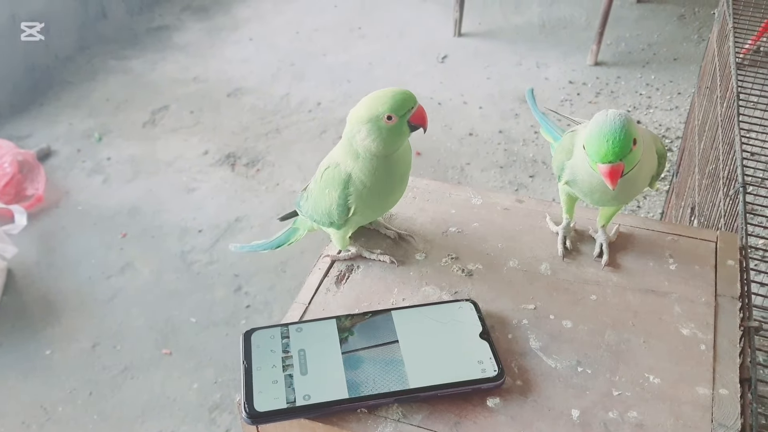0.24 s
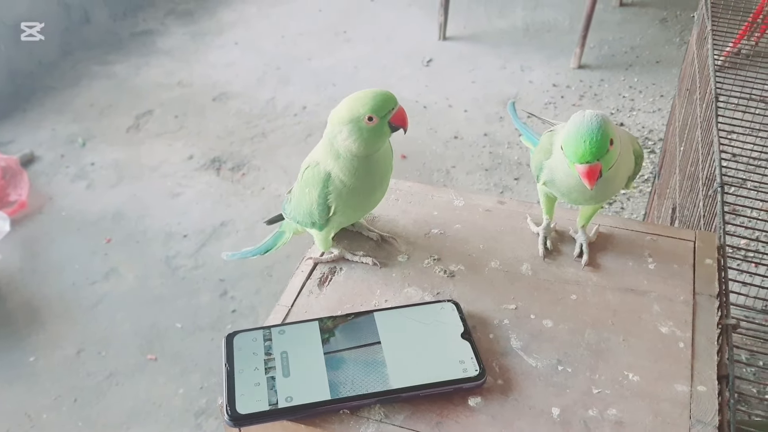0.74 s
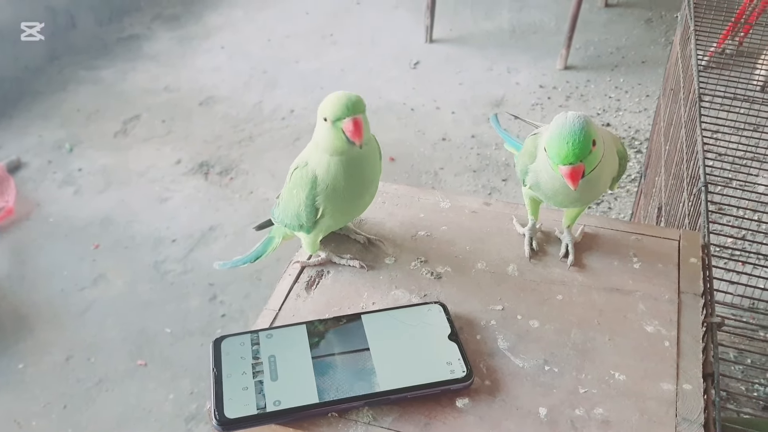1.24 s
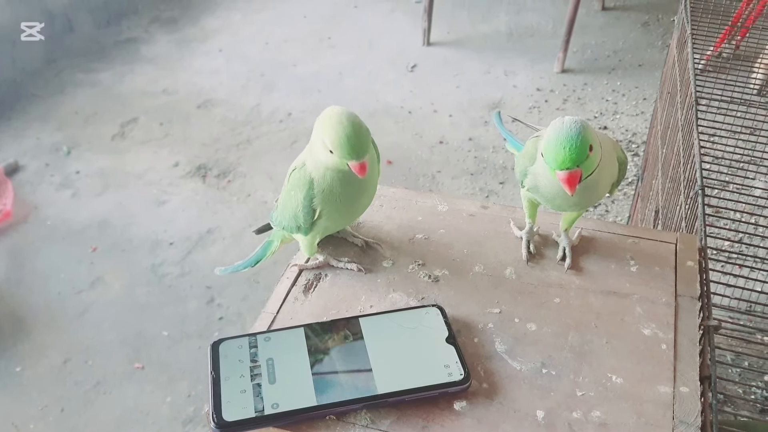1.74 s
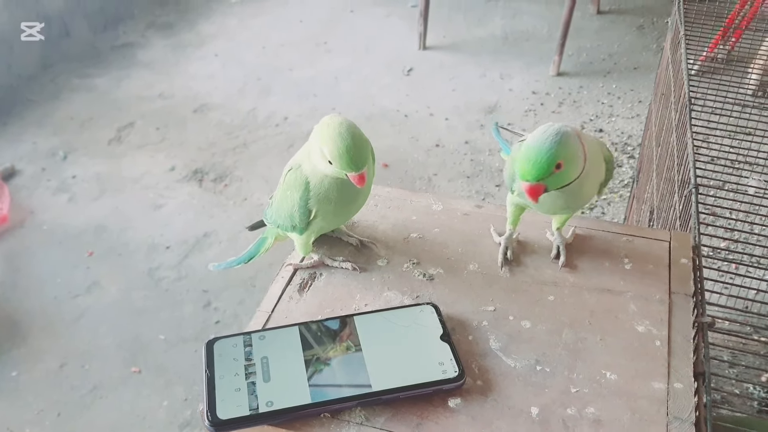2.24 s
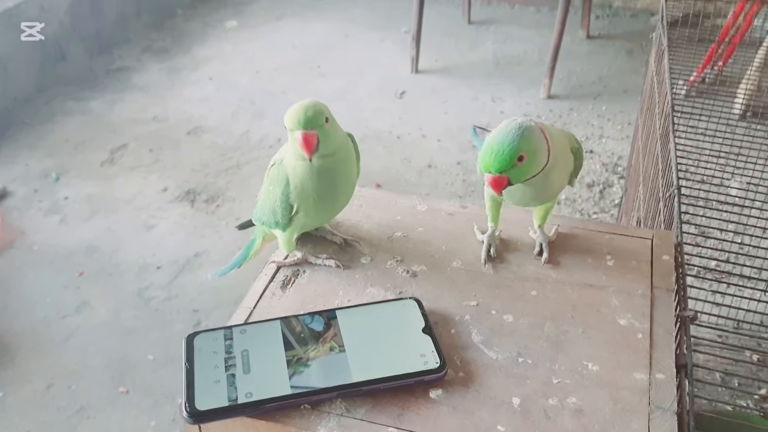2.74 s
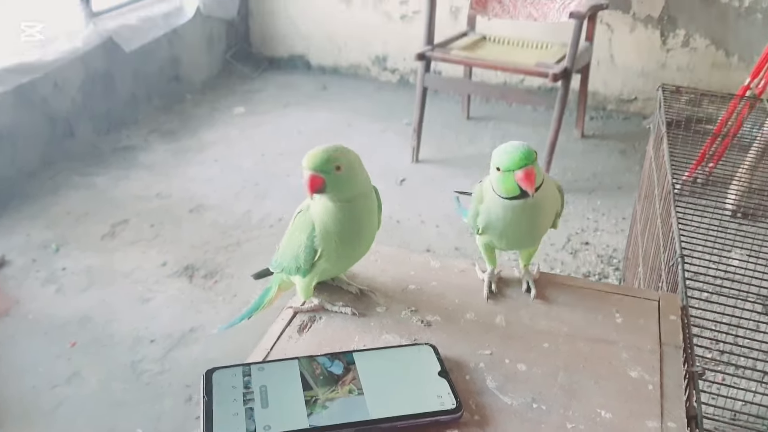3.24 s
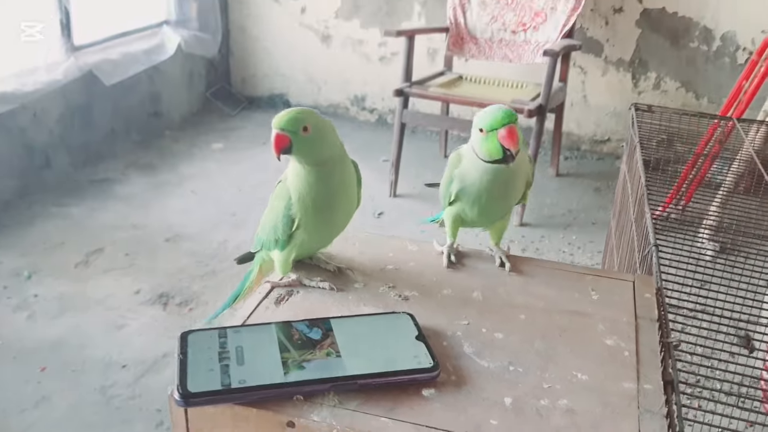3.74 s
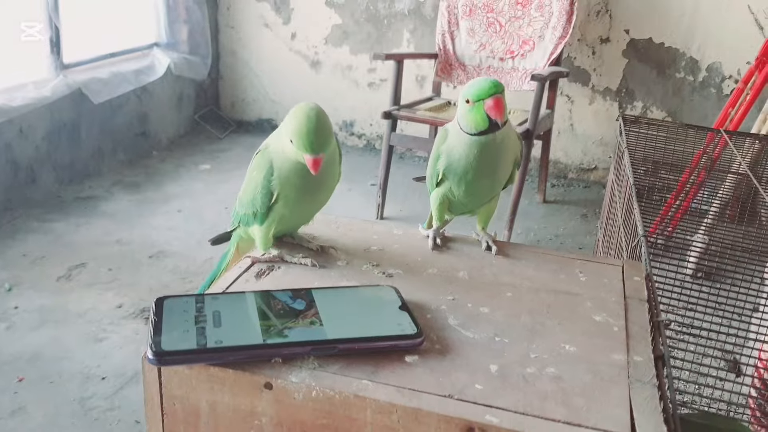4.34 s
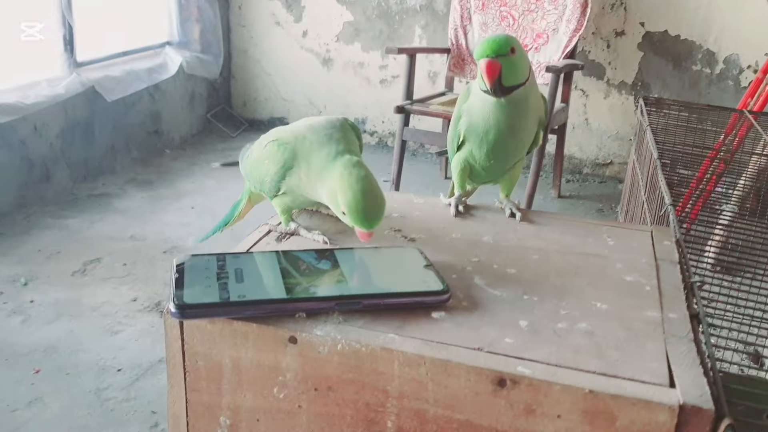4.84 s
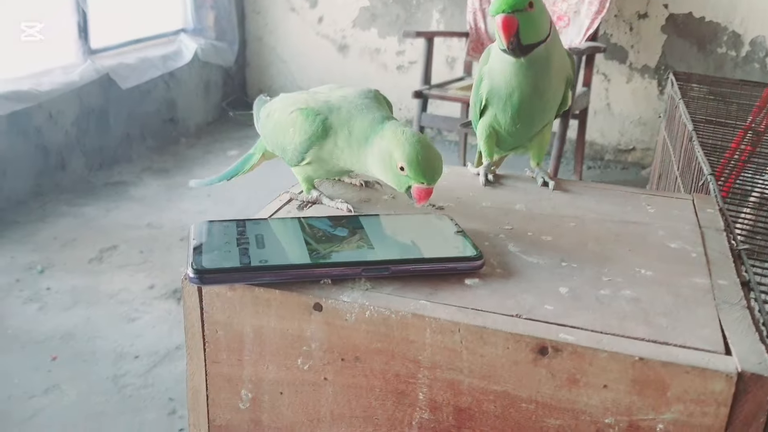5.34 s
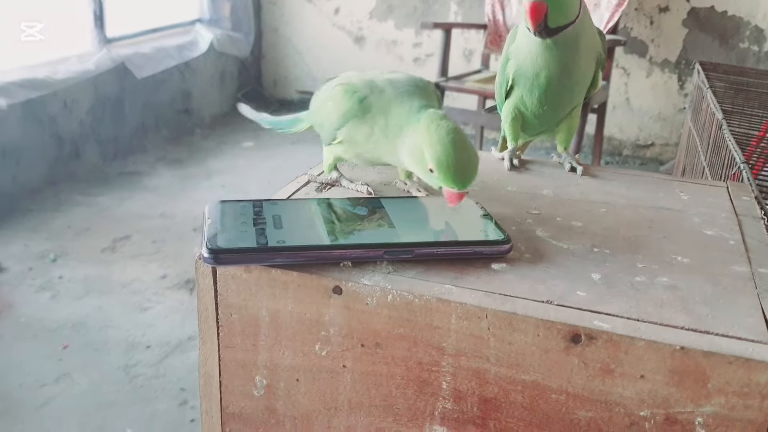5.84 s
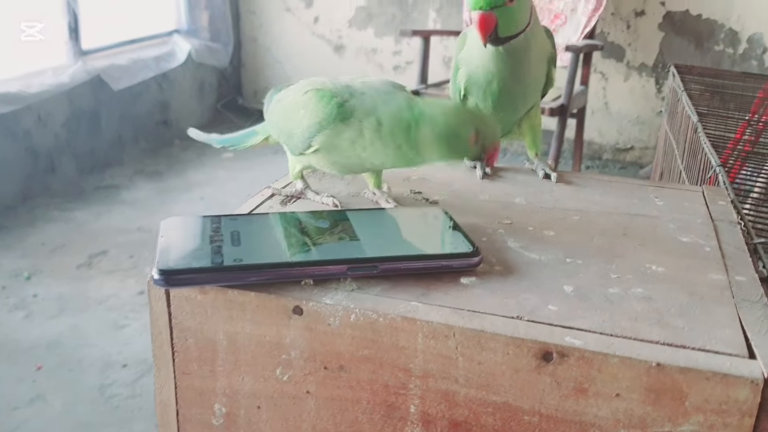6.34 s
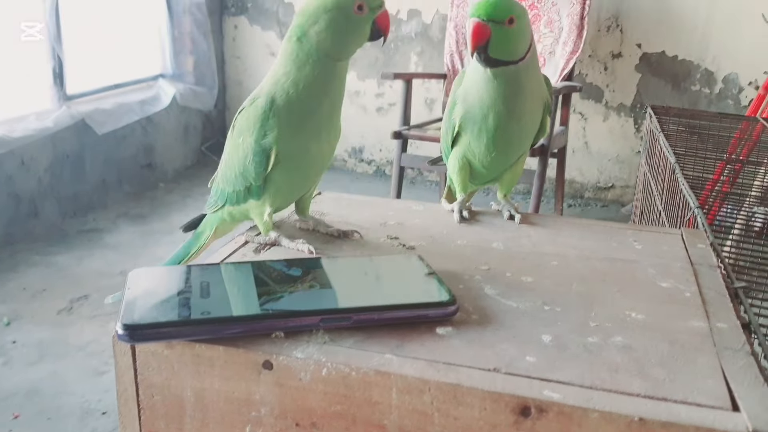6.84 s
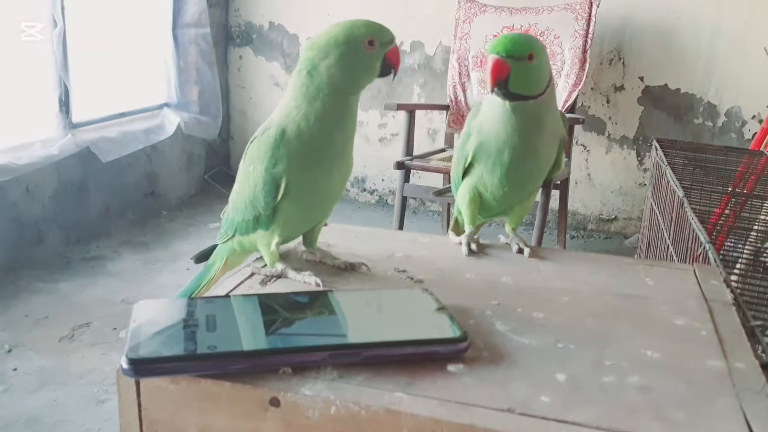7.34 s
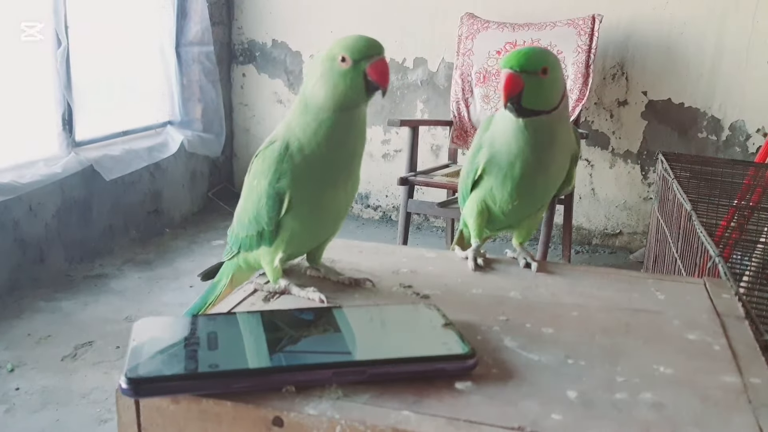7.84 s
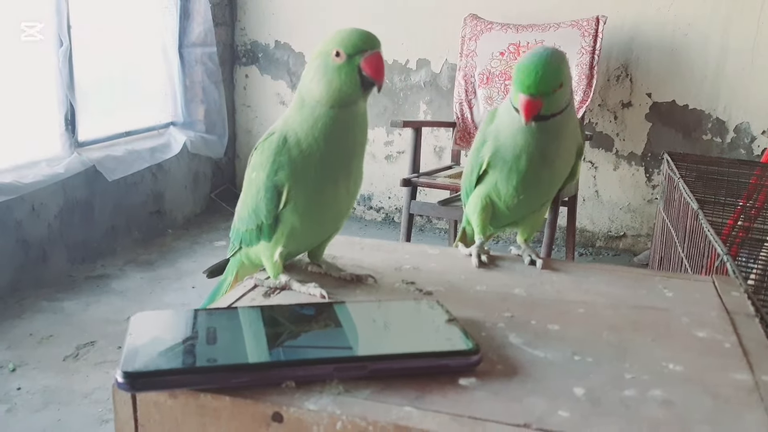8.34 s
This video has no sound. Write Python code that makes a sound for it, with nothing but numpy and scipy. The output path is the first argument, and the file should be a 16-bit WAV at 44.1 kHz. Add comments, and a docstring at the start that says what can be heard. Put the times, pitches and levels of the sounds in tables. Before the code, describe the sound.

Indoors, parakeets on a wooden table give separate nasal squawks that glide up and drop abruptly. Hoarse, distant-sounding answers fall between them. A buzzing rattle swells near the middle and a quieter one later, followed by a row of small whistled chips and sharp yelps. Short bright room echo, soft rustles, handling bumps, and a barely audible hum lie underneath.

```python
"""Parakeets call on a wooden table in a bare room: gliding squawks, breaking yelps, pulsed rattles, thin
whistles. Squawks, yelps and rattles are harmonics of a vibrating membrane shaped by a throat; whistles are
nearly pure tones. Hoarse calls are uneven noise. Fainter, wetter calls sound between the near ones, and a few
taps sound. Behind them lie a low rumble, a faint steady hum, soft rustles and still air; echoes make the room."""
import sys
import numpy as np
from scipy import signal
from scipy.fft import rfft, irfft, next_fast_len
from scipy.io import wavfile
from scipy.ndimage import uniform_filter1d, map_coordinates

SR = 44100
rng = np.random.default_rng(int(sys.argv[2]) if len(sys.argv) > 2 else 0)


def transcribe(u):
    """Save the signal u as a 16-bit wav file named by the first command-line argument.

    u: samples, shape (n,) or (channels, n), limited to [-1, 1]; the rate is SR.
    q: integer samples, one column per channel.
    """
    v = np.clip(np.atleast_2d(u).T, -1, 1)
    q = np.round(v * 32767).astype(np.int16)
    wavfile.write(sys.argv[1], SR, q)


N = 379701
TIME = np.arange(N) / SR
CUTOFF_HZ = 15800   # no partials or echoes above this

# Levels of all calls are before the mix in scene(); spectra give relative levels.
# throat resonances of the squawks and yelps: hz, level_db
THROAT = [(500, -6), (2000, 7), (2800, 4.5), (3600, -8.5), (5300, -5), (6300, -10.5), (7200, -13),
          (8500, -23.5), (11000, -23.5), (14500, -29), (16000, -39.5)]
# chips, a whistle between two hisses: start_s, length_s, top_hz, droop (share of pitch), whistle_db, hiss_db
CHIPS = [(6.523, 0.13, 3910, 0.088, -31, -30.5), (6.792, 0.11, 3900, 0.11, -32.5, -26.5),
         (7.079, 0.12, 3880, .07, -29, -25.5), (7.359, .095, 3810, .07, -29, -26.5),
         (7.503, 0.15, 3630, .12, -29, -27)]
# this far under its top level a squawk is mostly its two lowest partials:
# the fundamental there, and the change of the upper partials
SOFT_RANGE_DB, SOFT_FIRST_DB, SOFT_UPPER_DB = 26.5, 2.5, -17


def near_squawks(waver=.0038, rasp=0.011, screech_rasp=0.011, uneven=0.0067, push_lead=0.67):
    """Pitch glides to its top value and collapses; a fast flutter swings pitch and level together."""
    # start_s, length_s, rise_s, collapse_s, start_hz, top_hz, creep at the top (Hz/s), start_db, top_db,
    # last push_db, fundamental_db and upper_db (against the second partial, when loud), screech (0-1)
    squawks = [(.548, .38, .1, .035, 1205, 1175, 120, -21, -19.5, 1, -20, -3, 1.0),
               (1.445, .583, .28, .045, 765, 1220, 300, -48, -19, 1, -17, -5, .9),
               (2.355, .23, .205, .008, 1370, 2470, 0, -39, -14, 5, 22, 3, 0),
               (4.83, .302, .17, .08, 804, 1040, 0, -36, -26, 8, -8, -10, 0),
               (5.79, .53, .37, .068, 737, 1385, -400, -45, -16.5, 4, -11, 4, 0),
               (7.475, .125, .04, .012, 735, 760, 0, -38, -26, 0, -2, -14, 0),
               (7.627, .127, .045, .06, 1030, 1005, 0, -30, -22, 3, -6, -7, 0),
               (8.405, .4, .26, .05, 740, 1200, 0, -43, -24, 0, -4, -18, 0)]
    # change of the throat in a full screech: hz, change_db
    screech_colour = [(500, 14), (3000, -2.5), (4700, 5), (5800, -9.5), (7000, -9.5), (8300, -6),
                      (9600, 12.5), (11500, -9.5), (14500, -0.5)]
    attack_s, dip_s, push_s = 0.03, .04, 0.074
    # what the final collapse does: pitch lost (share), level, fundamental, added pitch scatter (share)
    collapse_share, collapse_db, collapse_first_db, collapse_rasp = .61, -18.5, 13, 0.067
    # pitch swings of the flutter (shares), and level swing for each unit of pitch swing
    screech_swing, shake_swing, throb_per_swing = 0.1, 0.054, 1.78
    shake_hz, shake_width_hz = 1220, 140   # any squawk shakes as it passes this pitch
    cycles_per_shake, cycles_per_screech = 12.5, 9.2   # vibrations in one flutter

    scatter = drift(940)
    wander = 1 + waver * drift(28)
    pace = 1 + uneven * drift(45)
    out = np.zeros(N)
    for (start, length, rise_s, fall_s, start_hz, top_hz, creep, start_db, top_db,
         push_db, first_db, upper_db, screech) in squawks:
        at, age, gate = span(start, length, attack_s, .004)
        _, pitch, level_db = arch(age, dip_s, rise_s, start_hz, top_hz, start_db, top_db)
        soft = np.clip((top_db - level_db) / SOFT_RANGE_DB, 0, 1)
        left_s = length - age
        collapse = np.clip(1 - left_s / fall_s, 0, 1) ** 2
        pitch = pitch + creep * np.maximum(age - dip_s - rise_s, 0)
        push = np.exp(-((left_s - push_lead * fall_s) / push_s) ** 2)
        level_db = level_db + collapse_db * collapse + push_db * push

        strain = np.clip(screech, 0, 1) * (1 - soft)   # a screech opens the beak and moves the resonances
        shake = shake_swing * np.exp(-((pitch - shake_hz) / shake_width_hz) ** 2)
        swing = np.maximum(screech_swing * strain, shake)
        cycles = cycles_per_shake + (cycles_per_screech - cycles_per_shake) * strain
        flutter = np.sin(2 * np.pi * np.cumsum(pitch / cycles * pace[at]) / SR)
        # a sharp swell at the top of each swing, with the average power held level
        throb = np.exp(throb_per_swing * swing * (flutter + flutter ** 2 / 2))
        throb /= np.sqrt(uniform_filter1d(throb ** 2, size=SR // 25))

        roughness = rasp + screech_rasp * strain + collapse_rasp * collapse
        bend = wander[at] + swing * flutter + roughness * scatter[at]
        first = first_db + (SOFT_FIRST_DB - first_db) * soft + collapse_first_db * collapse
        tone = syrinx(pitch * (1 - collapse_share * collapse) * bend, first, upper_db + SOFT_UPPER_DB * soft,
                      lambda hz: at_hz(THROAT, hz) + strain * at_hz(screech_colour, hz))
        out[at] += gate * throb * from_db(level_db) * tone
    return out


def arch(age, dip_s, rise_s, start_hz, top_hz, start_db, top_db):
    """Effort grows after a short dip and carries pitch and level from start to top values, up or down."""
    effort = np.sin(np.pi / 2 * np.clip((age - dip_s) / rise_s, 0, 1)) ** 1.7
    settle = 1 + .04 * np.clip(1 - age / dip_s, 0, 1) ** 2   # enters a little sharp, then settles
    pitch = settle * (start_hz + (top_hz - start_hz) * effort)
    level_db = start_db + (top_db - start_db) * effort ** 1.4
    return effort, pitch, level_db


def yelps(rasp=0.0091, waver=0.0061, edge_s=0.001):
    """The voice breaks into a new register, rough at first, then glides and fades."""
    # start_s, length_s, from_hz, to_hz, bend of the glide (power), peak_db, swell_s, fade (dB/s),
    # fundamental_db, upper_db, pitch scatter at the break (share)
    yelp_rows = [(0.0, 0.037, 1260, 504, 0.84, -9.5, 0.00094, 850, -17, -7, 0.12),
                 (2.578, 0.035, 1790, 453, 1.18, -13, 0.0093, 1200, -16, -12, 0.097),
                 (5.303, 0.082, 1377, 1875, 2.05, -18.5, 0.056, 20, 2, -14.5, 0.028),
                 (5.386, 0.068, 1470, 1292, 1.46, -9.5, .005, 125.5, -16.5, -14, .03),
                 (5.457, 0.061, 883.5, 864, 1.9, -18.5, 0.0089, 68, -6.5, 4.5, 0.19),
                 (7.86, .103, 871, 1946, 2.5, -15.5, 0.077, 599, -1.5, -15.5, 0.0043),
                 (7.967, 0.071, 1406, 1383, 3.8, -8.5, 0.0026, 104.5, -17.5, -19, 0.0028),
                 (8.03, 0.074, 937, 863, 1.7, -14.5, 0.021, 225, -7, 8, 0.22)]
    swell_db_per_s, break_s = 293.5, 0.013

    scatter = drift(920)
    wander = 1 + waver * drift(28)
    out = np.zeros(N)
    for (start, length, from_hz, to_hz, bend, peak_db, swell_s, fade,
         first_db, upper_db, break_rasp) in yelp_rows:
        at, age, gate = span(start, length, edge_s, edge_s)
        pitch = to_hz + (from_hz - to_hz) * np.clip(1 - age / length, 0, 1) ** bend
        pitch *= wander[at] + (rasp + break_rasp * np.exp(-age / break_s)) * scatter[at]
        level_db = peak_db - np.maximum(swell_db_per_s * (swell_s - age), fade * (age - swell_s))
        tone = syrinx(pitch, first_db, upper_db, lambda hz: at_hz(THROAT, hz))
        out[at] += gate * from_db(level_db) * tone
    return out


def rattles(opening_s=0.00082, closing_s=.0021, scatter=0.058):
    """The syrinx opens in brief pulses, forty to sixty a second, growing louder and brighter."""
    # first pulse_s, pulses (count), period_s, lag of the last pulse_s, first_hz, last_hz, first level_db,
    # top level_db, swell_s, fundamental_db, upper_db (halfway through)
    rattle_rows = [(.447, 6, 0.024, -0.013, 1470, 1300, -28, -18, .022, -15.5, 0.5),
                   (3.693, 21, 0.017, .009, 691, 897, -27, -7.5, 0.29, 0, 10.5),
                   (6.863, 22, .018, -.005, 696, 890.5, -37, -16, .28, -2, 4)]
    # throat resonances: hz, level_db
    rattle_throat = [(500, -4.5), (2000, 4.5), (2750, 2), (3500, -2), (4400, -21), (5400, -13), (7000, -24),
                     (10000, -27.5), (15000, -38)]
    opens_db = 18   # growth of the upper partials over a rattle

    bend = 1 + scatter * drift(500)
    out = np.zeros(N)
    for (start, pulses, period, lag_s, first_hz, last_hz, soft_db, top_db,
         swell_s, first_db, upper_db) in rattle_rows:
        last = round(pulses) - 1
        for k in range(last + 1):
            ending = np.exp((k - last) / 1.2)   # the last pulses fall out of step
            s = start + k * period + lag_s * ending
            at = round(s * SR) + np.arange(-SR // 100, SR // 100)
            age = TIME[at] - s
            gate = np.exp(-(age / np.where(age < 0, opening_s, closing_s)) ** 2 / 2)
            # the pitch moves only within this share of the rattle
            pitch = np.interp(k / last, [0.33, 0.81], [first_hz, last_hz])
            level_db = soft_db + (top_db - soft_db) * np.sin(np.pi / 2 * min(k * period / swell_s, 1))
            tone = syrinx(pitch * bend[at], first_db, upper_db + opens_db * (k / last - .5),
                          lambda hz: at_hz(rattle_throat, hz))
            out[at] += from_db(level_db) * gate * tone
    return out


def whistles(second_db=-19, third_db=-27, scatter=0.0092, flicker_db=4.5, edge_s=0.021):
    """Nearly pure, slightly unsteady tones on a parabola of pitch; in a chip it droops at the end."""
    # start_s, length_s, first_hz, middle_hz, last_hz, level_db
    plain = [(3.16, .13, 3230, 4280, 3610, -35), (3.14, .07, 4810, 5320, 6140, -38),
             (3.24, 0.046, 5600, 5250, 4900, -28), (3.37, 0.087, 2356, 2430, 2590, -35.5),
             (3.47, 0.12, 2563, 2593, 2640, -35.5), (5.235, 0.096, 1831, 1737, 1580, -33)]
    top_share = 0.26   # where in a chip the pitch peaks

    bend = 1 + scatter * drift(250)
    flicker = from_db(flicker_db * drift(40))
    out = np.zeros(N)
    places = np.array([0, .5, 1])
    sag = ((places - top_share) / (1 - top_share)) ** 2
    chips = [(start, length, *(top_hz * (1 - droop * sag)), level_db)
             for start, length, top_hz, droop, level_db, _ in CHIPS]
    for start, length, *pitches, level_db in list(plain) + chips:
        at, age, gate = span(start, length, edge_s, edge_s)
        pitch = np.polyval(np.polyfit(places, pitches, 2), age / length)
        phase = 2 * np.pi * np.cumsum(pitch * bend[at]) / SR
        tone = np.sin(phase) + from_db(second_db) * np.sin(2 * phase) + from_db(third_db) * np.sin(3 * phase)
        out[at] += np.sqrt(2) * gate * flicker[at] * from_db(level_db) * tone
    return out


def far_squawks(first_db=-10.5, upper_db=-3.0, dull_db=-1.5, rasp=0.0023):
    """Slow gliding calls, some of them breaking up as the effort grows."""
    # start_s, length_s, dip_s, rise_s, start_hz, top_hz, start_db, top_db, pitch scatter added at the top (share)
    far_calls = [(0.277, 0.16, 0.028, 0.11, 1218, 993, -36.5, -32.5, 0.14),
                 (1.776, 0.19, 0.038, 0.054, 1300, 1363, -31, -26, 0.0033),
                 (2.01, 0.21, 0.026, 0.094, 1652, 1693, -26.5, -46, 0.019),
                 (2.527, 0.42, 0.11, 0.24, 790, 1093, -30.5, -29, 0.012),
                 (3.061, 0.28, 0.013, 0.24, 590, 915, -33.5, -51.5, 0.031),
                 (3.304, 0.22, 0.026, 0.19, 1016, 1854, -33, -33.5, 0.0295),
                 (4.575, 0.34, 0.049, .21, 814, 1117, -38, -24, 0.0094),
                 (5.494, 0.32, 0.048, 0.25, 989, 1169, -25, -31, 0.014)]
    attack_s, release_s = 0.037, 0.067

    def throat(hz):
        """Distance dulls each octave."""
        return at_hz(THROAT, hz) + dull_db * np.log2(hz / 4000)

    scatter = drift(300)
    out = np.zeros(N)
    for start, length, dip_s, rise_s, start_hz, top_hz, start_db, top_db, top_rasp in far_calls:
        at, age, gate = span(start, length, attack_s, release_s)
        effort, pitch, level_db = arch(age, dip_s, rise_s, start_hz, top_hz, start_db, top_db)
        soft = np.clip((top_db - level_db) / SOFT_RANGE_DB, 0, 1)
        pitch *= 1 + (rasp + top_rasp * effort) * scatter[at]
        first = first_db + (SOFT_FIRST_DB - first_db) * soft
        tone = syrinx(pitch, first, upper_db + SOFT_UPPER_DB * soft, throat)
        out[at] += gate * from_db(level_db) * tone
    return out


def hoarse_calls(grain_db=3.5, wander=.03, taper=1.37):
    """Chaotic vibration: uneven noise through a low and a high throat resonance, which wander with the beak."""
    # start_s, length_s, attack_s, low throat_db, high throat_db
    hoarse = [(1.99, 0.25, .04, -41, -34), (3.03, 0.5, 0.2, -36, -35.5), (3.3, 0.34, 0.077, -37, -39),
              (3.6, 0.55, 0.07, -25, -35.5), (4.86, 0.13, 0.033, -32.5, -43.5),
              (5.22, 0.12, 0.024, -38, -53.5), (5.33, .1, 0.024, -35.5, -27.5),
              (5.4, 0.27, 0.031, -42, -24), (5.66, 0.26, 0.042, -40.5, -35)]
    # the hisses of a chip: place (share of the whistle), length_s, attack_s, level_db (added to the chip's hiss_db)
    chip_hisses = [(-.08, 0.12, 0.0083, -3), (0.845, .17, 0.013, 0)]
    # low and high throat resonance: hz, level_db
    low_rasp = [(400, -21), (1200, -10.5), (1800, 0.5), (2500, 5.5), (3200, -4), (4200, -30.5), (8000, -30)]
    high_rasp = [(1500, -45), (2900, 1), (3700, 6), (4300, 1), (5000, -3), (6000, -16.5), (9500, -19.5),
                 (15000, -51.5)]
    chip_low_db = -13.5   # low throat against high throat in a chip's hiss

    low, high = [noise(colour)[0] * rms_one(from_db(grain_db * drift(90))) for colour in (low_rasp, high_rasp)]
    speed = 1 + wander * drift(25)
    out = np.zeros(N)
    hisses = [(start + place * length, hiss_s, attack_s, hiss_db + db + chip_low_db, hiss_db + db)
              for start, length, *_, hiss_db in CHIPS
              for place, hiss_s, attack_s, db in chip_hisses]
    for start, length, attack_s, low_db, high_db in list(hoarse) + hisses:
        at, _, gate = span(start, length, attack_s, max(length - attack_s, attack_s / 2))
        read = [at[0] + np.cumsum(speed[at])]   # reading at an uneven speed shifts the resonances
        low_part = from_db(low_db) * map_coordinates(low, read)
        high_part = from_db(high_db) * map_coordinates(high, read)
        out[at] += gate ** taper * (low_part + high_part)
    return out


def taps(t60=0.18, level_db=-13):
    """Beak and claws touch the table: noise starts at once and dies away, 60 dB in t60 seconds."""
    # time_s, strength_db (before level_db)
    tap_rows = [(2.931, -17.5), (2.986, -29), (4.676, -35)]
    # hz, level_db
    tap_colour = [(150, -17), (600, -10.5), (4000, -6.5), (15000, -26)]
    blows = np.zeros(N)
    for s, strength_db in tap_rows:
        blows[round(s * SR)] = from_db(strength_db + level_db)
    fading = signal.lfilter([1], [1, -from_db(-60 / (t60 * SR))], blows)
    return noise(tap_colour)[0] * fading


def background(rumble_db=-60.5, apart=0.63):
    """Noise rumble that swells with handling of the microphone, a steady hum, soft rustling, still air."""
    # handling bumps, then rustles of movement: time_s, level_db (of the noise they scale), half-length_s
    bumps = [(3.5, -58.5, 1), (5.26, -40, 0.12), (5.58, -57, 0.41), (6.15, -50.5, 0.14), (6.9, -55, 0.2),
             (7.75, -52, 0.32)]
    movements = [(1.15, -49, 0.12), (2.15, -47, 0.43), (7.3, -41.5, 0.16)]
    # noise spectra: hz, level_db
    rumble_colour = [(15, -56), (25, -23), (32, -17), (56, -8), (86, 1), (139, -4), (178, -22.5),
                     (250, -21), (320, -44), (550, -120)]
    rustle_colour = [(100, -27.5), (300, -3), (700, -10), (2500, -9), (15000, -31.5)]
    air_colour = [(120, -51), (200, -4.5), (2430, -11), (11200, -31.5), (15600, -43)]
    hum_hz, hum_db, air_db = 94, -82, -60.5

    rumble_level = from_db(rumble_db) + swells(bumps)
    # one part common to both sides and one part different on each side
    rumble = rumble_level * (noise(rumble_colour) + apart * noise(rumble_colour, channels=2))
    hum = from_db(hum_db) * np.sqrt(2) * np.sin(2 * np.pi * hum_hz * TIME)
    rustling = swells(movements) * noise(rustle_colour, channels=2)
    air = from_db(air_db) * noise(air_colour, channels=2)
    return rumble + hum + rustling + air


def swells(rows):
    """Each movement rises and dies away smoothly."""
    return sum(from_db(level_db) * np.exp(-((TIME - s) / width) ** 2) for s, level_db, width in rows)


def room(x, gap_s=0.0037, early_db=11.0, early_s=0.012, count=9):
    """Dense echoes, strongest from the table and near walls, dying sooner in the treble; unit power gain."""
    # time for echoes to fall by 60 dB: hz, decay_s
    decay_times = [(500, 0.29), (2700, 0.28), (7000, 0.22), (15000, 0.037)]
    t = TIME[:SR * 2 // 3]
    edges, tail = np.geomspace(150, CUTOFF_HZ, count + 1), 0
    for low, high in zip(edges, edges[1:]):
        band_pass = signal.butter(2, [low, high], "band", fs=SR, output="sos")
        band = signal.sosfilt(band_pass, rng.standard_normal((2, len(t))))
        tail = tail + band * from_db(-60 * t / at_hz(decay_times, np.sqrt(low * high)))
    tail = tail * (t > gap_s) * from_db(early_db * np.exp(-t / early_s))
    tail /= np.sqrt((tail ** 2).sum(1, keepdims=True) * SR / 2 / CUTOFF_HZ)
    return signal.fftconvolve(x[None], tail, axes=1)[:, :N]


def syrinx(pitch, first_db, upper_db, throat, count=20):
    """Harmonics of the vibrating membrane, the upper ones shaped by the throat; unit power."""
    k = np.arange(1, count + 1)[:, None]
    gain = from_db(upper_db + throat(k * pitch))
    gain[0], gain[1] = from_db(first_db), 1   # the second partial is the reference
    gain *= k * pitch < CUTOFF_HZ
    phase = 2 * np.pi * np.cumsum(pitch) / SR
    return (gain * np.sin(k * phase)).sum(0) / np.sqrt((gain ** 2).sum(0) / 2)


def span(start, length, attack_s, release_s):
    """The samples that a call covers, their age in seconds, and its soft start and stop."""
    at = np.flatnonzero((TIME >= start) & (TIME < start + length))
    age = TIME[at] - start
    edge = np.clip(np.minimum(age / attack_s, (length - age) / release_s), 0, 1)
    return at, age, np.sin(np.pi / 2 * edge)


def drift(rate):
    """Random wander of spread 1, about `rate` turns a second."""
    r = np.exp(-2 * np.pi * rate / SR)
    # the first second is dropped so that the wander is already under way
    return rms_one(signal.lfilter([1], [1, -2 * r, r * r], rng.standard_normal(N + SR))[SR:])


def noise(spectrum, channels=1):
    """Coloured noise of unit power."""
    return rms_one(through(rng.standard_normal((channels, N)), lambda hz: from_db(at_hz(spectrum, hz))))


def through(x, response):
    """Filter by a response given as a function of frequency."""
    size = next_fast_len(N + SR)
    hz = np.arange(size // 2 + 1) * SR / size
    return irfft(rfft(x, size) * response(hz), size)[..., :N]


def at_hz(points, hz):
    """Read a spectrum on a log-frequency axis."""
    f, value = np.transpose(points)
    return np.interp(np.log(np.maximum(hz, 1)), np.log(f), value)


def rms_one(x):
    """Scale to unit power."""
    return x / np.sqrt(np.mean(x ** 2) + 1e-20)


def from_db(db):
    """Decibels to gain."""
    return 10 ** (np.asarray(db) / 20)


def scene(near_db=1.0, near_wet_db=-4.0, rattle_db=0.0, rattle_wet_db=-5.5,
          far_db=-6.5, far_wet_db=0.0, whistle_db=0.0, whistle_wet_db=-1.0):
    """Each voice arrives directly and through the room; the far ones are mostly room."""
    # the right side against the left: hz, lag (radians)
    port_lag = [(1200, -0.17), (2500, -0.74), (3800, 1), (5300, -1.83)]
    near, rattle, whistle = near_squawks() + yelps(), rattles(), whistles()
    far = far_squawks() + hoarse_calls() + taps()
    direct = from_db(near_db) * near + from_db(rattle_db) * rattle
    direct = direct + from_db(far_db) * far + from_db(whistle_db) * whistle
    wet = from_db(near_wet_db) * near + from_db(rattle_wet_db) * rattle
    wet = wet + from_db(far_wet_db) * far + from_db(whistle_wet_db) * whistle
    right = through(direct, lambda hz: np.exp(-1j * at_hz(port_lag, hz)))
    return np.array([direct, right]) + room(wet) + background()


def record(dry):
    """The left microphone port is shaded, the highest peaks are rounded, the top is cut."""
    # left port: hz, level_db
    left_port = [(150, -9), (500, -3), (1200, -3), (2400, -9), (4200, -1), (9000, -2)]
    ceiling = .92   # peaks bend smoothly towards this amplitude
    left = through(dry[0], lambda hz: from_db(at_hz(left_port, hz)))
    shaded = np.array([left, dry[1]])
    rounded = shaded / (1 + (shaded / ceiling) ** 6) ** (1 / 6)
    return signal.sosfilt(signal.ellip(10, .1, 80, CUTOFF_HZ, fs=SR, output="sos"), rounded)


dry = scene()
out = record(dry)
transcribe(out)
```